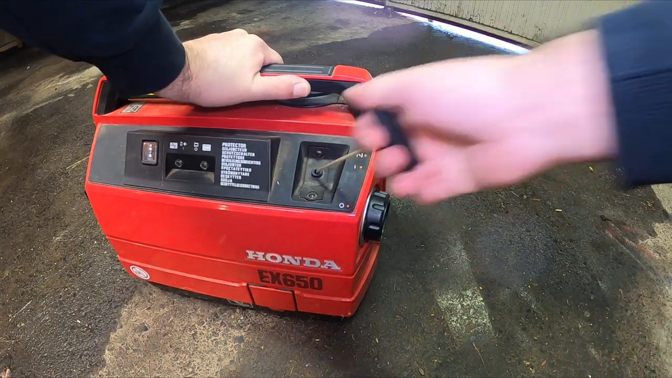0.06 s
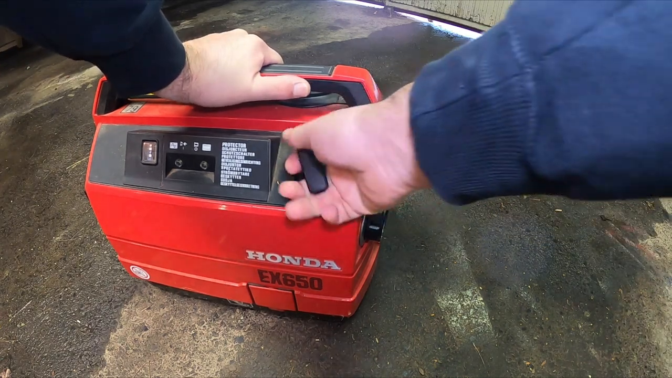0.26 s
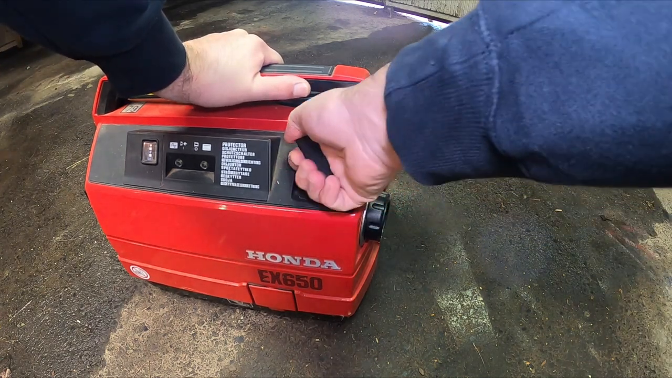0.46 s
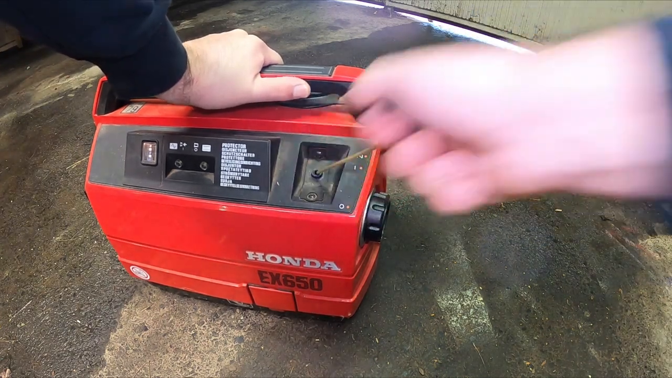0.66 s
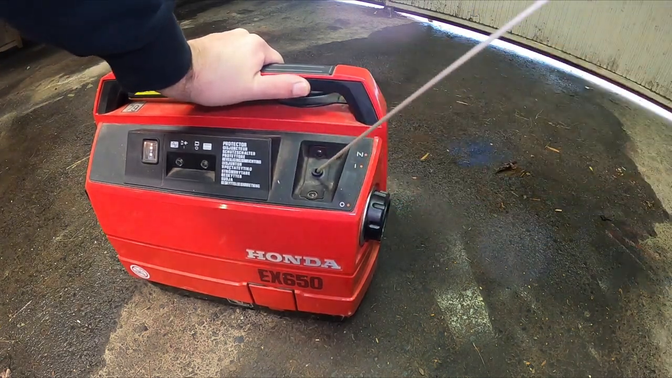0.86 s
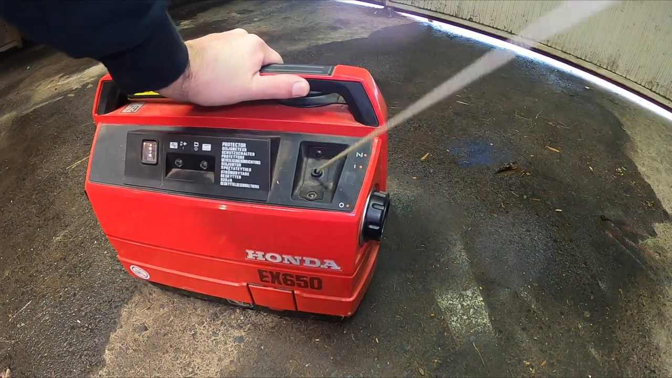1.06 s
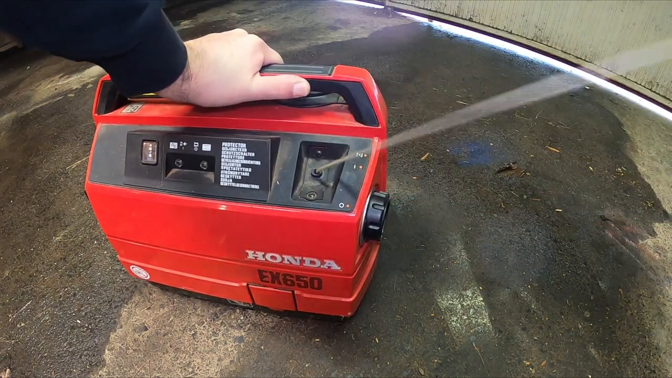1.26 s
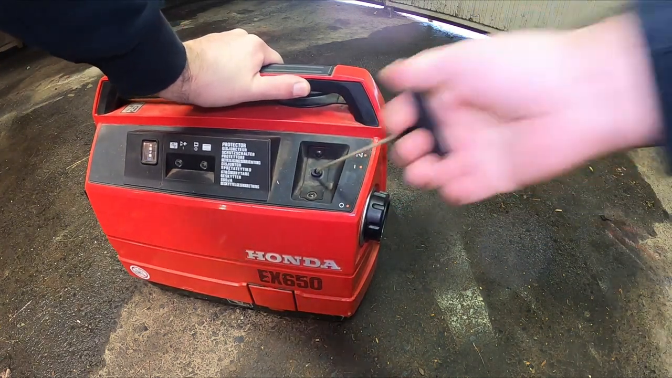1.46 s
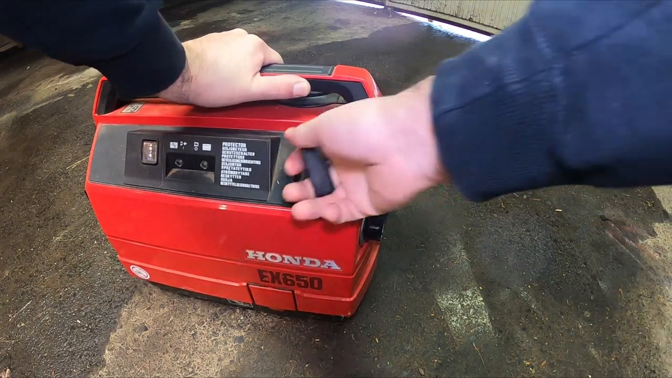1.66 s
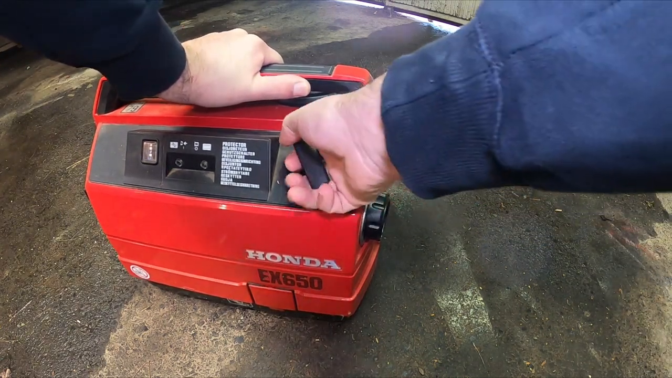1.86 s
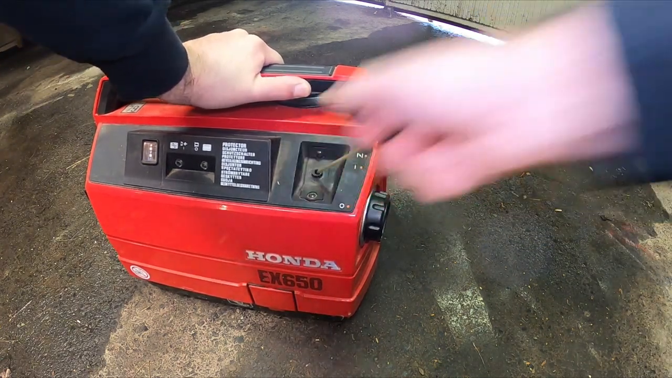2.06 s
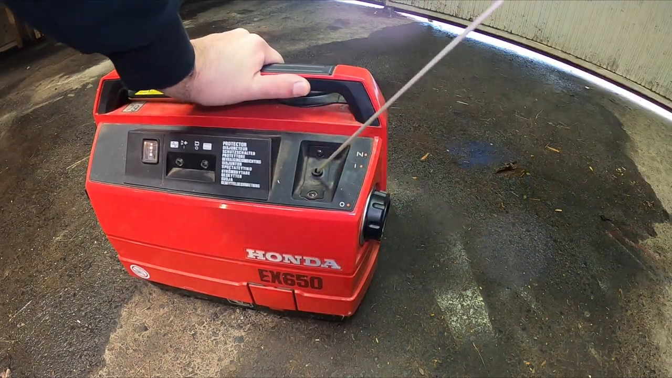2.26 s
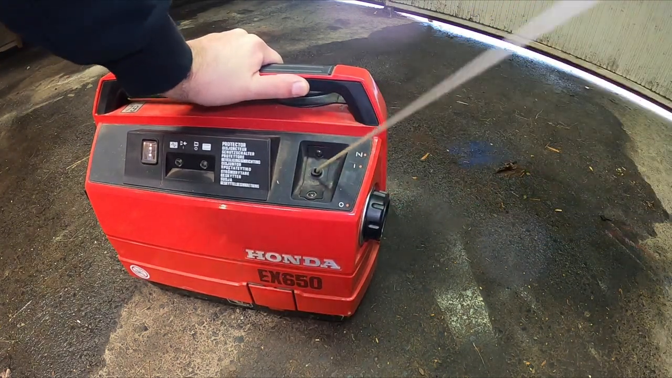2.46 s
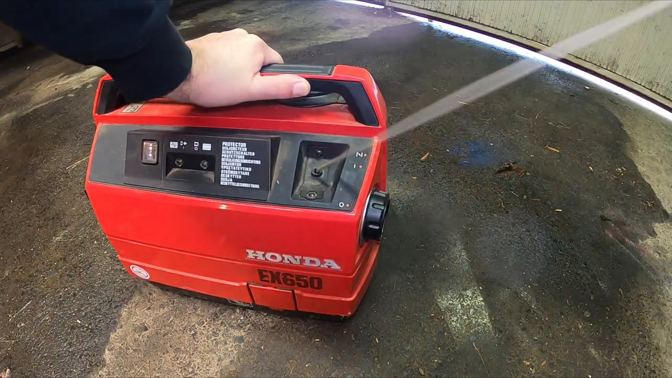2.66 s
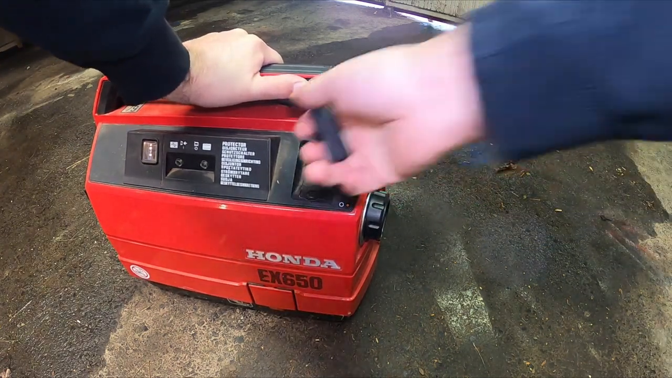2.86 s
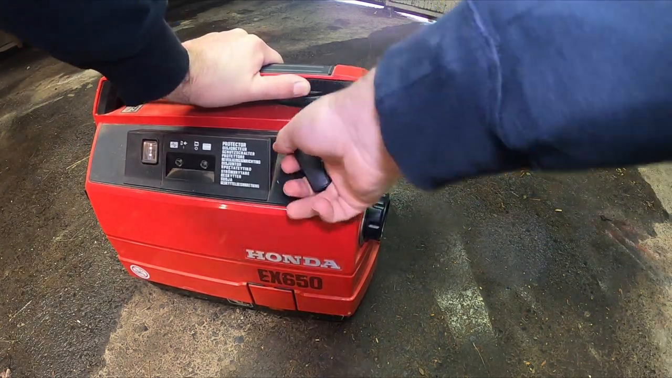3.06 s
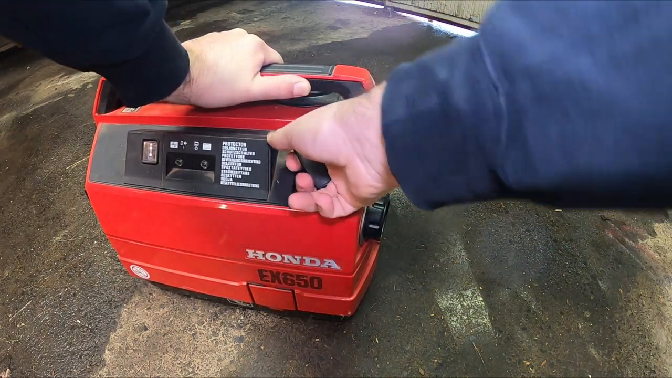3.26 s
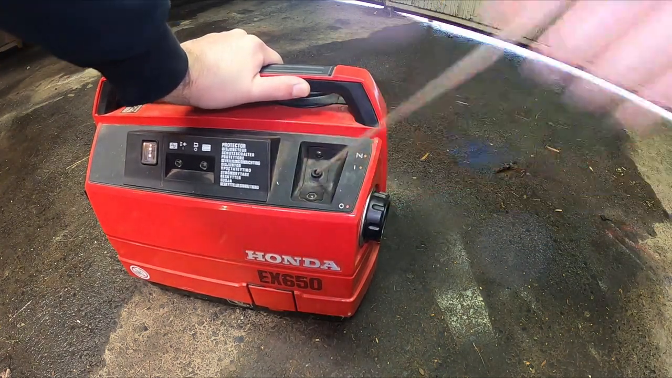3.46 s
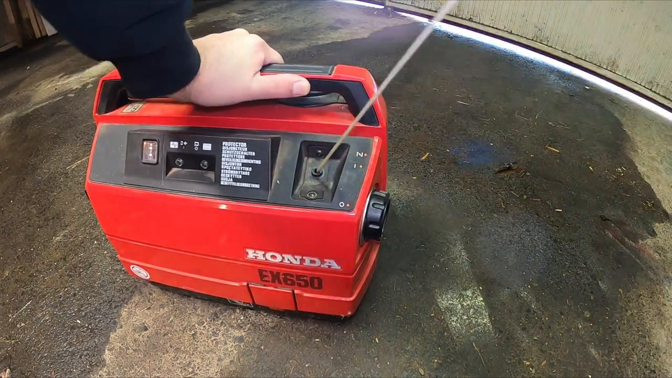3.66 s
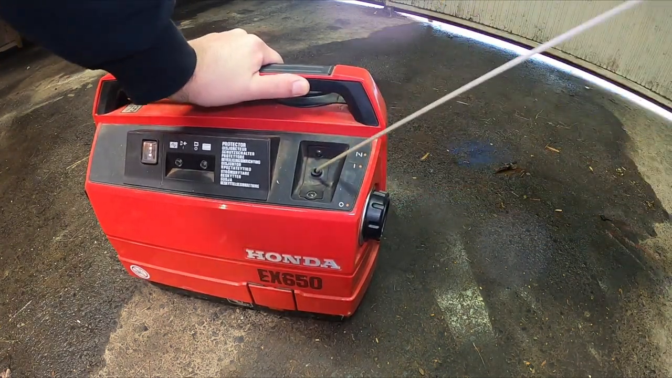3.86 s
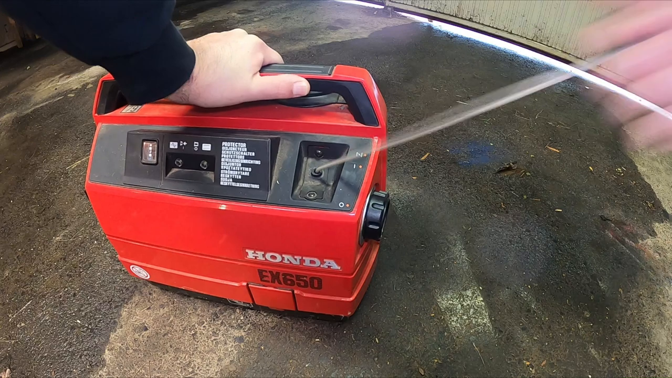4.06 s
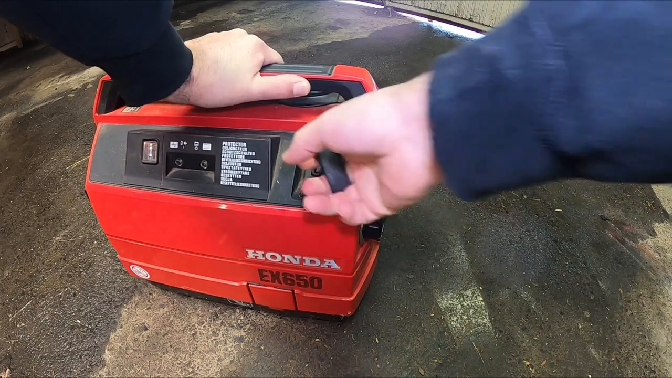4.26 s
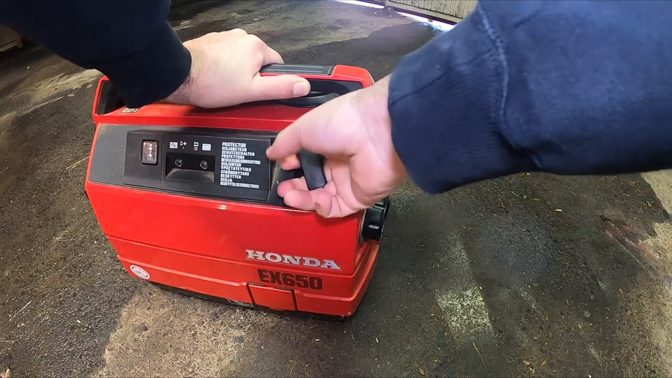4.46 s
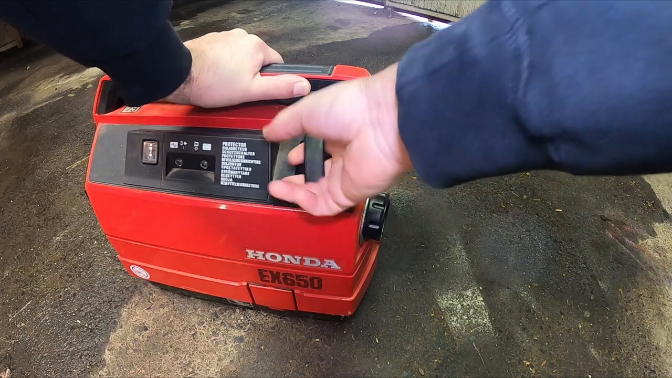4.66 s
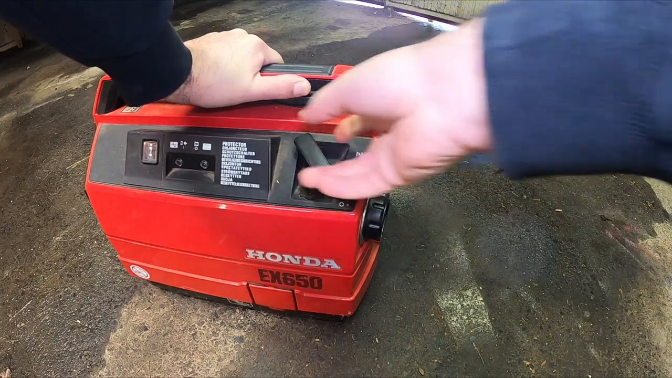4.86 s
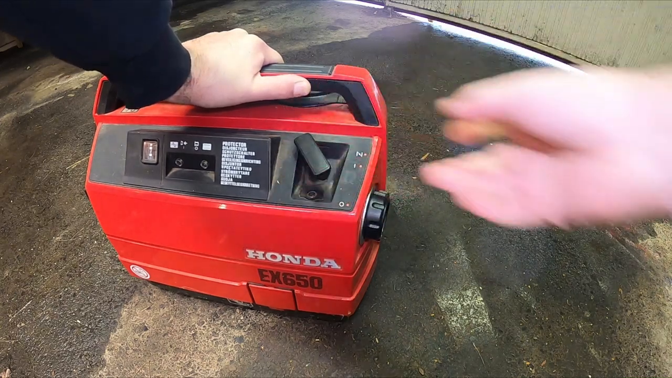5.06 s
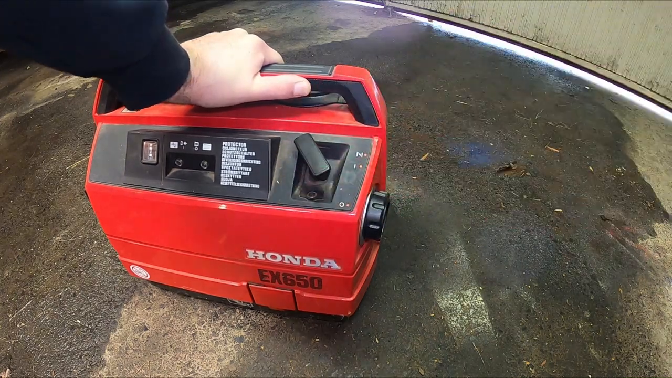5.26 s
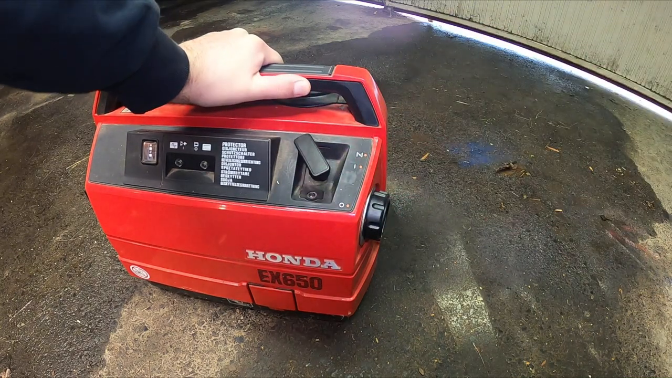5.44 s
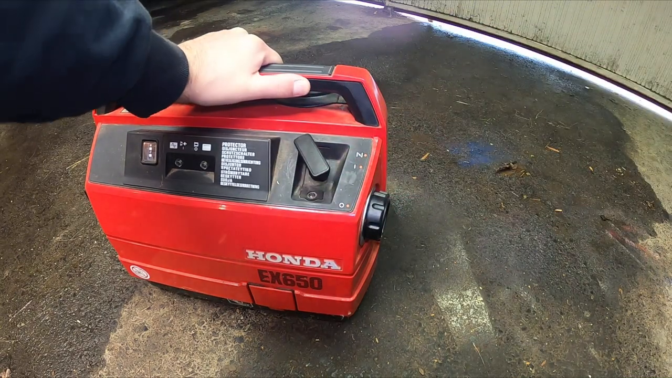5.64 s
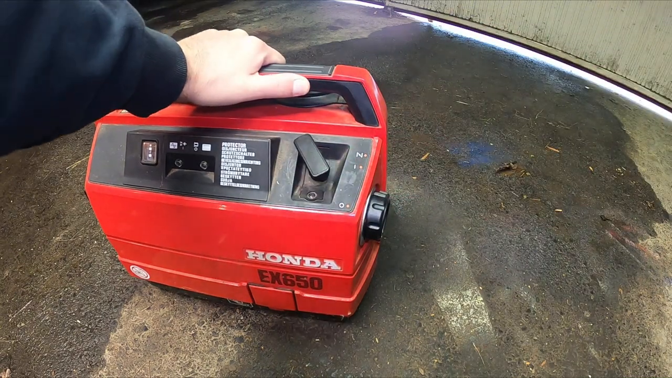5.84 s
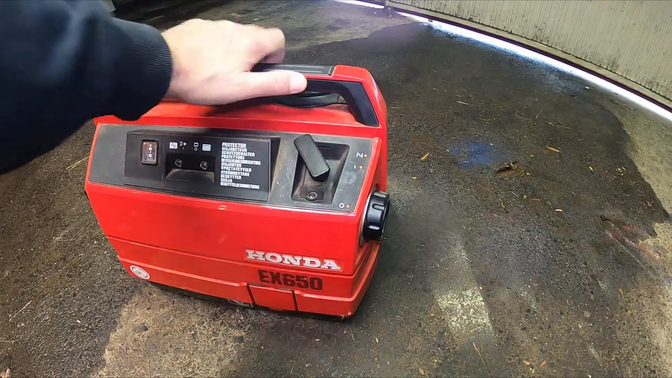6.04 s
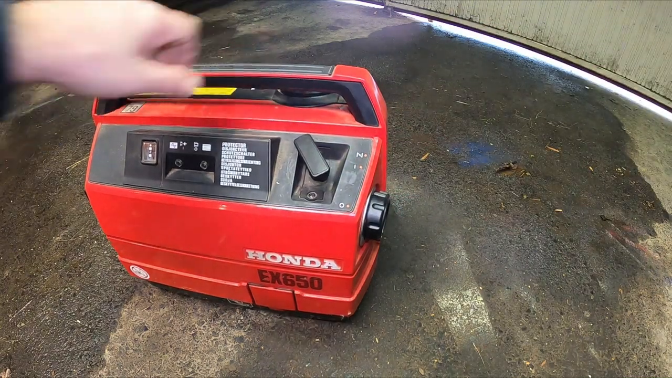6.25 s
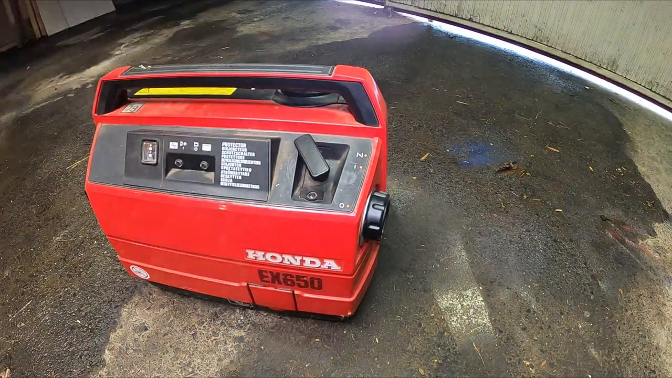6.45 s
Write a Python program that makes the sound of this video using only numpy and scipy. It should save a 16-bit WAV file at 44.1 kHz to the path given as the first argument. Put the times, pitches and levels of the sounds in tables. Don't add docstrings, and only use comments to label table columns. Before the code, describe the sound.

A small petrol engine's pull cord zips out and whirs back twice without success, then a third pull catches into a steady, puttering run.

```python
import sys
import numpy as np
from scipy import signal
from scipy.fft import rfft, irfft, next_fast_len
from scipy.io import wavfile
from scipy.ndimage import uniform_filter1d

SR = 44100
rng = np.random.default_rng(int(sys.argv[2]) if len(sys.argv) > 2 else 0)


def volts_from_decibels(level):
    exponent = np.asarray(level, float) / 20
    return 10 ** exponent


def pcm_store(signal):
    levels = np.round(np.clip(np.atleast_2d(signal), -1, 1) * 32767)
    wavfile.write(sys.argv[1], SR, levels.astype(np.int16).T)


N = 286797
T = np.arange(N) / SR

# pawls_grip_s, pawls_let_go_s, flywheel_coast_s, rub_db, heave_db
PULLS = [
    (-.65, -.27, .84, -19, -28),
    (.768, 1.142, .88, -19.5, -22),
    (2.182, 2.525, .78, -19.5, -21),
    (3.55, 3.87, .86, -18, -19),
]
# time_s, four_stroke_cycles_done
CRANK = [(4.35, -2.6), (4.535, -1), (4.625, 0), (4.699, 1), (4.765, 2), (4.824, 3), (4.88, 4), (5.029, 7),
         (5.165, 10), (5.32, 13.58), (5.467, 17), (5.58, 19.56), (5.69, 22), (5.914, 27), (6.1, 31),
         (6.6, 41.6)]


def evened(x):
    return x / np.sqrt(np.mean(x ** 2) + 1e-20)


def wander(shape, samples):
    return evened(uniform_filter1d(rng.standard_normal(shape), size=samples))


def read(points, hz):
    f, value = np.transpose(points)
    return np.interp(np.log(hz + 1), np.log(f + 1), value)


def add(mix, s, sound):
    part = mix[round(s * SR):][:len(sound)]
    part += sound[:len(part)]


def dulled(x, hz):
    return signal.sosfilt(signal.butter(4, hz, fs=SR, output="sos"), x)


def resonate(x, hz, width):
    r = np.exp(-np.pi * max(width, 1) / SR)
    if np.ndim(hz) == 0:
        return 2 * signal.lfilter([1 - r], [1, -r * np.exp(2j * np.pi * hz / SR)], x + 1e-18).real
    turn = np.exp(2j * np.pi * np.cumsum(hz) / SR)
    return 2 * (turn * signal.lfilter([1 - r], [1, -r], x / turn + 1e-18)).real


def swell(start, length, edge):
    u = np.clip((T - start) / length, 0, 1)
    return np.sin(np.pi / 2 * np.clip(np.minimum(u, 1 - u) / edge, 0, 1)) ** 2


def gritty(spectrum, patchy_db, grit_db, per_s):
    _, _, z = signal.stft(rng.standard_normal(N), SR, nperseg=512)
    patches = uniform_filter1d(rng.standard_normal(z.shape), size=5, axis=0)
    patches = evened(uniform_filter1d(patches, size=6, axis=1))
    x = signal.istft(z * volts_from_decibels(patchy_db * patches), SR, nperseg=512)[1][:N]
    scrapes = rng.exponential(1, N) * (rng.random(N) < per_s / SR)
    x = x * (1 + volts_from_decibels(grit_db) * signal.lfilter([1], [1, -np.exp(-1 / 60)], scrapes))
    size = next_fast_len(N)
    colour = volts_from_decibels(read(spectrum, np.fft.rfftfreq(size, 1 / SR)))
    return evened(irfft(rfft(x, size) * colour, size)[:N])


def stroke(grip, free, coast):
    done = np.clip((T - grip) / (free - grip), 1e-6, 1)
    left = np.clip(1 - (T - free) / coast, 1e-6, 1)
    return done, left


def drawing():
    level_db = [-29, -28.5, -28]
    # time_s, pitch_hz
    speeds = [
        [(.8, 600), (.85, 1060), (.89, 1790), (.935, 1640), (.981, 2396), (1.0, 2540), (1.022, 2400),
         (1.048, 2530), (1.112, 2200), (1.14, 2350)],
        [(2.2, 628), (2.274, 1535), (2.32, 2127), (2.346, 1760), (2.384, 2430), (2.452, 2700), (2.476, 2450),
         (2.52, 2630)],
        [(3.58, 770), (3.622, 1604), (3.644, 1500), (3.678, 2080), (3.732, 2504), (3.774, 2420), (3.794, 2640),
         (3.826, 2448), (3.87, 2490)],
    ]
    surge_hz_per_s, tension_db, tire_db = 8000., 1.5, -4.5
    for db, (s, points) in zip(level_db, map(np.transpose, speeds)):
        t = np.arange(s[0] - .004, s[-1], 1 / SR)
        hz = uniform_filter1d(np.interp(t, s, points), size=300)
        tension = tension_db * np.tanh(np.gradient(hz) * SR / surge_hz_per_s)
        tiring = tire_db * (t - t[0]) / (t[-1] - t[0])
        yield t[0], hz, db + tension + tiring


def rewinding():
    level_db = [-49, -37, -34.5, -35]
    # time_s, pitch_hz
    speeds = [
        [(.004, 1950), (.04, 1850), (.12, 1400), (.22, 1050)],
        [(1.258, 2750), (1.28, 3350), (1.298, 3680), (1.325, 3200), (1.355, 2780), (1.4, 2530), (1.48, 2060),
         (1.56, 1420), (1.65, 1150)],
        [(2.65, 2800), (2.685, 3260), (2.72, 3170), (2.76, 3190), (2.79, 2900), (2.82, 2500), (2.86, 2060),
         (2.945, 1420), (3.02, 1150)],
        [(3.995, 2900), (4.012, 3330), (4.04, 3620), (4.075, 3260), (4.115, 3120), (4.14, 2880), (4.21, 2060),
         (4.24, 1900), (4.32, 1350)],
    ]
    fade_db_per_s = -76
    for db, (s, points) in zip(level_db, map(np.transpose, speeds)):
        t = np.arange(s[0], s[-1], 1 / SR)
        hz = uniform_filter1d(np.interp(t, s, points), size=400)
        yield s[0], hz, db + fade_db_per_s * (t - s[0])


def braid(runs, strands):
    out = np.zeros(N)
    for start, hz, level_db in runs:
        for multiple, db in strands:
            pitch = multiple * hz * (1 + .017 * wander(len(hz), 300))
            tone = np.sin(2 * np.pi * np.cumsum(pitch) / SR) * volts_from_decibels(4.8 * wander(len(hz), 420))
            fuzz = resonate(rng.standard_normal(len(hz)), pitch, 90.)
            tone += 0.45 * evened(resonate(fuzz, pitch, 120.))
            add(out, start, tone * volts_from_decibels(db - 3.5 + level_db) * signal.windows.tukey(len(hz), .08))
    return out


def cord():
    # multiple_of_pitch, level_db
    out_strands = [(.56, -4), (1, 1), (1.56, -3.5), (2.05, -11), (2.6, -12), (3.15, -13)]
    back_strands = [(.36, -3), (.64, 1), (1, 4), (1.3, -11)]
    # pitch_hz, width_hz, level_db
    guide_modes = [(910, 90, 3), (1350, 150, 0), (1700, 150, 0), (2050, 110, 5), (2480, 220, 3),
                   (3350, 220, 3), (3880, 300, 9)]
    song = braid(drawing(), out_strands) + braid(rewinding(), back_strands)
    flares = sum(volts_from_decibels(db) * resonate(song, hz, w) for hz, w, db in guide_modes)
    return dulled(dulled(song + flares, 4300), 4300)


def rush():
    # pitch_hz, level_db
    low_spectrum = [(88, -16), (150, -4.5), (257, -16.5), (346, 0), (544, -9), (659, -3), (943, 0),
                    (1200, -1), (2600, -14.5), (3380, -21), (5720, -120)]
    high_spectrum = [(1060, -20.5), (1800, -6), (2090, -3.5), (2740, -2.5), (3420, -1), (3840, -7.5),
                     (4240, -12), (7850, -25.5), (10100, -38), (11000, -41), (12500, -39.5), (15200, -60)]
    # start_s, length_s, level_db, brightness_db
    brushes = [
        (.38, .4, -66, 5),
        (.71, .08, -53, 1),
        (2.146, .045, -43, -2),
        (3.104, .03, -42, -9),
        (3.35, .05, -60, 0),
        (3.43, .08, -62, 0),
        (3.12, .14, -60, -14),
        (3.5, .07, -37, -8),
        (4.96, .2, -50, -2),
    ]
    # pitch_hz, width_hz, level_db
    housing = [(345, 40, -1), (460, 50, 0), (910, 60, -6), (1220, 90, -8), (2060, 50, -5), (2449, 20, 2),
               (2503, 20, 1), (3390, 150, -9)]
    bite_s, load_s = .007, .07
    body, bright = np.full(N, volts_from_decibels(-78.)), np.full(N, volts_from_decibels(-66))
    for grip, free, coast, db, _ in PULLS:
        done, left = stroke(grip, free, coast)
        slowing = np.log10(left)
        since = np.maximum(T - grip, 0)
        loaded = np.minimum(since / load_s, 1)
        pull = volts_from_decibels(db - 1.5 - 11 * (1 - loaded) - 6 * done)
        pull = pull * np.minimum(since / bite_s, 1) * (T < free)
        spin = volts_from_decibels(db - 10 + 32 * slowing) * (T >= free)
        body += pull + spin * volts_from_decibels(5 * slowing)
        body += volts_from_decibels(db + 11) * since / bite_s * np.exp(-since / bite_s)
        body += volts_from_decibels(db - 9.) * swell(free - .03, .08, .5)
        bright += pull * volts_from_decibels(-5 - 3.5 * (1 - done)) + spin * volts_from_decibels(-3 + 4 * slowing)
    for start, length, db, bright_db in brushes:
        body += volts_from_decibels(db) * swell(start, length, .25)
        bright += volts_from_decibels(db + bright_db) * swell(start, length, .25)
    low = gritty(low_spectrum, 3.2, -11.0, 150.)
    high = gritty(high_spectrum, 1.22, -15.0, 300.)
    rub = volts_from_decibels(-5.5) * body * low + bright * high
    return rub + sum(volts_from_decibels(db) * resonate(rub, hz, w) for hz, w, db in housing)


def cup():
    # time_s, level_db, rim_db
    releases = [
        (1.1425, -15, -16),
        (2.5245, -14.5, -19.5),
        (3.8695, -18, -8),
    ]
    # pitch_hz, level_db, t60_s
    cup_modes = [(1295, -11, 0.15), (2449, 4, 0.72), (2503, 0, 0.76), (2590, -10.5, 0.36),
                 (7620, -27, 0.15), (10000, -36.5, .4), (12040, -48, .3)]
    rim_modes = [(5046, -3, .4), (5130, -3, .35), (5240, -3, .35), (5330, -4, .35), (5379, -6, .4),
                 (5440, -6, .25), (5814, -12, .5)]
    top_modes = [(9189, -2, 0.25), (12200, 0, 0.13), (12840, -3, 0.16), (13650, -38, 5.0),
                 (14480, -1, 0.077)]
    blows, t = np.zeros((2, N)), np.arange(SR) / SR
    for s, db, rim_db in releases:
        chatter = .12 * rng.standard_normal(SR) * (rng.random(SR) < 1500. / SR) * volts_from_decibels(-60 * t / .72)
        chatter[0] = 1
        add(blows[0], s, volts_from_decibels(db - 5.0) * chatter)
        add(blows[1], s, volts_from_decibels(db + rim_db - 1.5 - 60 * t / 3.) * chatter)

    def ring(modes):
        return sum(volts_from_decibels(db - 60 * t / min(t60, .95)) * np.sin(2 * np.pi * hz * t) for hz, db, t60 in modes)

    rings = [ring(cup_modes) + volts_from_decibels(-36) * ring(top_modes), ring(rim_modes)]
    wobble = volts_from_decibels(np.array([[1.9], [5.5]]) * wander((2, N), 250))
    return (signal.oaconvolve(blows, rings, axes=1)[:, :N] * wobble).sum(0)


def knocks():
    # time_s, level_db, pitch_hz, treble_db, t60_s
    case_knocks = [(0.391, -39.5, 1350, -18.5, 0.053), (0.772, -18, 1320, -25, 0.066),
                   (0.958, -17.5, 1070, -31, 0.03), (1.797, -66, 7700, -30, 0.06),
                   (2.1445, -15, 3340, -24, 0.012), (2.1447, -23, 5200, -30, 0.012),
                   (2.1858, -30, 5200, -30, 0.03), (3.556, -30, 5200, -30, 0.03),
                   (2.122, -48, 1300, -30, 0.02), (2.135, -52, 1300, -30, 0.02),
                   (2.185, -26, 1200, -10, 0.03), (2.1895, -13, 1250, -22, 0.02),
                   (3.106, -28.5, 953, -23, 0.03), (3.511, -33, 1350, -30, 0.046),
                   (3.534, -30, 1320, -29, 0.011), (3.555, -24, 900, -16, 0.03),
                   (3.56, -15, 1426, -22, 0.051), (3.568, -22, 1000, -14, 0.03),
                   (4.51, -28, 960, -32, 0.034), (4.602, -24, 1200, -30, 0.025),
                   (4.682, -28, 1300, -27, 0.02), (4.748, -24, 1500, -27, 0.012),
                   (4.808, -25, 1100, -27, 0.015), (4.838, -26, 1200, -27, 0.015),
                   (5.392, -26, 2500, -24, 0.012), (5.686, -27, 1500, -24, 0.012),
                   (3.365, -56, 1300, -30, 0.06), (4.914, -30.5, 891, -21, 0.03)]
    handle_drop = [
        (4.9414, -12, 1940, -38, 0.018),
        (4.9484, -19, 1200, -45, 0.015),
        (4.9578, -7, 2900, -31, 0.004),
        (4.9582, -6, 1956, -42, 0.007),
        (4.9588, -13, 1200, -44, 0.015),
        (4.9634, -18, 940, -42, 0.011),
    ]
    pawl_snaps = [
        (1.1413, -19, 2800, -13, 0.033),
        (2.5257, -23, 2740, -4, 0.015),
        (3.8701, -12, 2760, -12.5, 0.012),
    ]
    out, t = np.zeros(N), np.arange(4000) / SR
    for s, db, hz, treble_db, t60 in case_knocks + handle_drop + pawl_snaps:
        burst, hiss = rng.standard_normal((2, 4000))
        burst = evened(resonate(resonate(burst, 1700.0, 2400.), 1700.0, 2400.))
        hiss = evened(resonate(resonate(hiss, 6500., 5000.), 7000., 6000.))
        ring = (np.sin(2 * np.pi * hz * t) + 0.45 * burst) * volts_from_decibels(-60 * t / max(t60, .004))
        tick = volts_from_decibels(treble_db + 4.0 - 60 * t / 0.011) * hiss
        add(out, s, dulled(volts_from_decibels(db) * (ring + tick), 9800.0))
    return out


def shaking():
    # start_s, length_s, rumble_db, rocking_db
    nudges = [
        (-.1, .2, -42, -37),
        (.36, .2, -56, -53),
        (.5, .28, -80, -52),
        (1.2, .9, -70, -48),
        (1.74, .14, -60, -60),
        (2.7, .3, -42, -41),
        (3.0, .22, -47, -66),
        (3.3, .25, -66, -60),
        (3.9, .6, -33, -36),
        (4.3, .4, -24, -50),
    ]
    rumble, rock = np.zeros((2, N))
    for grip, free, coast, _, db in PULLS:
        done, left = stroke(grip, free, coast)
        ending = np.minimum(10 * left, 1)
        rumble += volts_from_decibels(db + 46 * np.log10(done) - 54 * (1 - left)) * ending
        rock += volts_from_decibels(db - 16 + 40 * np.log10(np.minimum(done * 1.4, 1)) - 40 * (1 - left)) * ending
    for start, length, rumble_db, rock_db in nudges:
        rumble += volts_from_decibels(rumble_db) * swell(start, length, .5)
        rock += volts_from_decibels(rock_db) * swell(start, length, .3)
    return rumble, rock


def case():
    # time_s, level_db, pitch_hz
    thumps = [(0.44, -35.5, 224), (0.79, -23.5, 223), (0.981, -27.5, 110), (1.014, -19, 137),
              (1.046, -10.5, 129), (1.125, -10.5, 77), (1.162, -14.5, 123), (1.318, -21, 127),
              (1.798, -33, 200), (2.188, -20.5, 208), (2.412, -16, 127), (2.445, -13, 118),
              (2.524, -9.5, 127), (2.56, -19.5, 127), (2.657, -17.5, 88), (3.102, -29, 175),
              (3.561, -18.5, 212), (3.731, -17, 138), (3.764, -15, 129), (3.843, -12.5, 81),
              (3.874, -13, 118), (4, -17.5, 135), (4.144, -17, 120), (4.303, -16.5, 102), (4.47, -19, 127)]
    rumble, rock = shaking()
    noise, t = rng.standard_normal((2, N)), np.arange(6000) / SR
    out = rumble * volts_from_decibels(-3.0) * evened(resonate(resonate(noise[0], 99.0, 134.0), 92.0, 130.))
    out += rock * evened(resonate(resonate(noise[1], 35.2, 7.), 31.5, 21.0))
    for s, db, hz in thumps:
        thump = volts_from_decibels(db - 1.0 - 60 * t / 0.085) * np.sin(2 * np.pi * hz * t)
        add(out, s, thump * np.minimum(t / 0.0044, 1))
    return out


def muffler(hz):
    # pitch_hz, width_hz, level_db
    resonances = [(46.6, 47, -11), (71.4, 8.3, -2.5), (98.7, 17, -3), (117.5, 8.5, 1.5), (149, 60, -9.5),
                  (190.2, 5.3, -1), (255, 106, -7.5)]
    return sum((-1) ** k * volts_from_decibels(db) / (1 + 2j * (hz - f) / w) for k, (f, w, db) in enumerate(resonances))


def exhaust(cycles, missing):
    firing = dict([(1, -41.5), (2, -6), (3, -13.5), (4, -14), (5, 0), (6, -7), (7, -17), (8, -9.5),
                   (9, -17.5), (10, -18.5), (11, -28), (12, -25.5), (13, -30), (14, -28.5)])
    # multiple_of_half_rate, level_db
    missing_orders = [(1, -34), (2, -18), (3, -7.5), (4, -2), (5, -9), (6, -32), (7, -5), (8, -8), (9, 1.5),
                      (10, -17), (11, -16), (12, 2), (13, -8.5), (14, -3), (15, -20.5), (16, -4.5),
                      (17, -29), (18, -12), (19, -15), (20, -12), (21, -15), (22, -14), (23, -14),
                      (24, -13.5), (25, -30), (26, -20.5), (27, -22.5), (28, -14)]
    step, on = slice(None, None, 64), slice(round(CRANK[0][0] * SR), None)
    rate = np.gradient(cycles[step]) * SR / 64
    settled = np.clip((rate - 9.) / 13.9, .35, 1)
    out = np.zeros(N)
    for k, miss_db in missing_orders:
        hz = k / 2 * rate
        fired = (volts_from_decibels(firing.get(k / 2, -90.)) / abs(muffler(k / 2 * 22.5))) ** settled * muffler(hz)
        fired = fired * np.exp(-1.2 * (1 - settled) * abs(np.log(hz / 95. + 1e-3)))
        fired = fired * np.exp(.39j * k ** 2 * settled)
        missed = volts_from_decibels(miss_db) * abs(muffler(hz) / muffler(k / 2 * 21.3))
        if k in range(10, 16):
            missed = missed * np.exp(1j * np.pi * (.026 * k - .57) * k)
        else:
            missed = missed * (-1) ** k
        missed = missed * np.exp(-.17j * np.pi * k)
        gain = (1 - missing[step]) * fired + missing[step] * missed
        uneven = wander((2, len(gain)), 110)
        gain *= (1 + .15 * uneven[0]) * np.exp(.25j * uneven[1])
        gain = np.interp(T[on], T[step], gain.real) + 1j * np.interp(T[on], T[step], gain.imag)
        phase = np.pi * (k * (cycles[on] - .55) - .026 * k ** 2)
        out[on] += (gain * np.exp(1j * phase)).real
    return out / np.sqrt(abs(uniform_filter1d(out ** 2, size=8001)) + 1e-6)


def chamber_boom(cycles, labour):
    # pitch_hz, width_hz, level_db
    chambers = [(36, 16, -9), (71, 7, 1), (97, 8, 2), (122, 9, 1), (152, 22, -7), (195, 30, -13),
                (240, 40, -16)]
    late = cycles + .6 - .115 * np.arange(len(chambers))[:, None]
    puffs = np.diff(np.floor(late), prepend=-4)
    puffs = puffs + 2.4 * labour * np.diff(np.floor(late + .5), prepend=-4)
    puffs = uniform_filter1d(puffs, size=120)
    boom = sum(volts_from_decibels(db) * resonate(puff, hz, w) for puff, (hz, w, db) in zip(puffs, chambers))
    return boom / np.sqrt(abs(uniform_filter1d(boom ** 2, size=6001)) + 1e-12)


def block_knock(cycles, missing, labour, first_miss):
    # pitch_hz, width_hz, level_db
    block_modes = [(500, 170, -2), (640, 190, -5), (900, 260, -18), (1600, 500, -16)]
    number = np.floor(cycles + .08 - .22 * labour * (1 - missing))
    strength = np.where((number >= first_miss) & (number % 2 == 0), .3, 1)
    strength = strength * volts_from_decibels(1.8 * rng.standard_normal(50))[np.clip(number, 0, 49).astype(int)]
    strength = strength * np.clip((number + 1.6) / 2.4, .1, 1)
    fire = strength * (np.diff(number, prepend=-3) > 0)
    burn = signal.oaconvolve(fire, signal.windows.hann(400))[:N]
    fire = fire + .4 * np.roll(fire, round(.018 * SR))
    shove = 2.0 * signal.oaconvolve(fire, signal.windows.hann(40))[:N]
    shove = shove + .3 * burn * rng.standard_normal(N)
    knock = sum(volts_from_decibels(db) * resonate(resonate(shove, hz, w), hz, w) for hz, w, db in block_modes)
    return dulled(knock, 3800.0), burn


def engine():
    # time_s, exhaust_db
    burn_levels = [(4.4, -46), (4.49, -33), (4.58, -18.5), (4.68, -17), (4.8, -17.5), (4.93, -16),
                   (5.0, -18), (5.08, -23), (5.16, -17), (5.33, -16), (5.48, -18), (5.59, -16), (5.74, -20),
                   (5.84, -19), (5.94, -20), (6.1, -18.5), (6.5, -18.5)]
    # pitch_hz, level_db
    clatter_spectrum = [(150, -26), (260, -3.5), (353, -5.5), (488, -0.5), (856, -11), (932, -6.5),
                        (1160, -11.5), (1660, -10), (2180, -16.5), (2960, -15), (4540, -31.5),
                        (7690, -42.5), (12400, -62), (15200, -92)]
    first_miss, governed_per_s = 28, 22.
    cycles = np.interp(np.arange(N + SR // 20) / SR, *np.transpose(CRANK))
    cycles = uniform_filter1d(cycles, size=4001)[:N]
    missing = np.clip(cycles - first_miss + 1, 0, 1)
    rate = uniform_filter1d(np.gradient(cycles), size=2001) * SR
    labour = np.clip(1 - rate / governed_per_s, 0, .35)
    slow = np.clip(labour / .1, 0, 1) * (1 - missing)

    s, db = np.transpose(burn_levels)
    exhaust_db = np.interp(np.minimum(T, T[-1] - .04), s, db, left=-120, right=-120)
    exhaust_db = exhaust_db + 3 * labour * np.cos(2 * np.pi * (cycles - .6))
    note = (1 - .85 * slow) * exhaust(cycles, missing) + volts_from_decibels(0.5) * slow * chamber_boom(cycles, labour)

    knock, burn = block_knock(cycles, missing, labour, first_miss)
    knock_db = -12.5 + 22 * labour * (1 - missing) + 3 * missing

    throb = 1 + 0.17 * burn + 0.095 * np.cos(4 * np.pi * (cycles - .1))
    clatter = gritty(clatter_spectrum, 1.1, -14., 200.) * throb
    clatter_db = -30.5 + 70 * np.minimum(T - 4.62, 0) - 99 * (T < s[0])
    return volts_from_decibels(exhaust_db) * note + volts_from_decibels(knock_db) * knock + volts_from_decibels(clatter_db) * clatter


def walls(x):
    # pitch_hz, t60_s
    decay = [(100, 0.4), (1000, 0.43), (4000, 0.16), (12000, 0.13)]
    taps = np.zeros((2, SR // 2))
    at = np.arange(200, SR // 2 - 20, 20) + rng.integers(0, 20, (2, (SR // 2 - 201) // 20))
    np.put_along_axis(taps, at, rng.choice([-1., 1.], at.shape), 1)
    hz, t, z = signal.stft(taps, SR, nperseg=256)
    # (Hz, dB)
    share = [(30, -26), (60, -17), (250, -13), (700, -5), (1500, -2), (3500, 1), (5500, 9), (9000, 9)]
    tail_db = read(share, hz)[:, None] - 60 * t / read(decay, hz)[:, None]
    tail = signal.istft(z * volts_from_decibels(tail_db), SR, nperseg=256)[1]
    return signal.fftconvolve(x[None], tail / np.linalg.norm(tail[0]), axes=1)[:, :N]


def yard():
    # pitch_hz, level_db
    air_spectrum = [(35, -37), (60, -20), (174, -3), (235, -9.5), (303, -12.5), (698, -33.5), (1400, -16),
                    (2330, -26.5), (2500, -29.5), (4770, -34.5), (6020, -17.5), (6450, -51), (7240, -36),
                    (8920, -55.5), (15200, -63.5)]
    return volts_from_decibels(-59.5) * np.array([gritty(air_spectrum, 2.1, -9.5, 50.) for _ in range(3)])


def ports(x):
    # pitch_hz, lead_radians
    lead = [(0, 0), (2580, -.9), (4130, -2.), (5860, -2.9), (7500, -2.6), (9500, -.9), (12500, -.3),
            (22050, 0)]
    # pitch_hz, level_db
    tilt = [(60, 2), (99, 0.5), (160, 0.0), (270, 1), (440, 0.0), (730, -0.5), (1210, 0.0), (1990, 1.5),
            (3290, 5.5), (5420, -4.5), (8940, -16), (14700, -11.5)]
    size = next_fast_len(N + 4096)
    hz = np.fft.rfftfreq(size, 1 / SR)
    half = volts_from_decibels(read(tilt, hz) / 2) * np.exp(.5j * np.interp(hz, *np.transpose(lead)))
    pair = np.array([half, 1 / half])
    return irfft(rfft(x, size) * pair / np.maximum(abs(pair.mean(0)), .6), size)[:, :N]


def scene():
    machine = cord() + rush() + cup() + knocks() + case() + engine()
    air = yard()
    return ports(machine + .8 * air[0]) + volts_from_decibels(-6) * walls(machine) + .6 * air[1:]


def roll_off(x):
    return signal.sosfilt(signal.butter(12, 15340, fs=SR, output="sos"), x)


def record(dry):
    rounded = .95 * np.tanh(dry / .95)
    mix = dulled(dulled(rounded, 15000), 15000) * np.minimum((T[-1] - T) / .004, 1)
    return roll_off(mix)


dry = scene()
out = record(dry)
pcm_store(out)
```